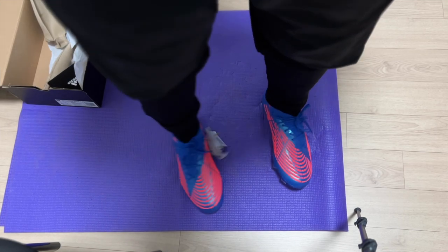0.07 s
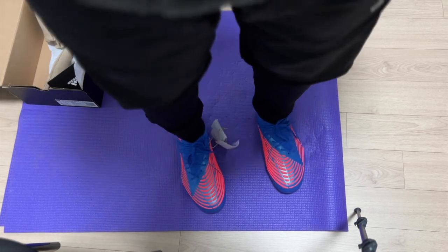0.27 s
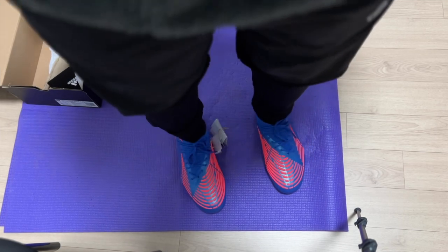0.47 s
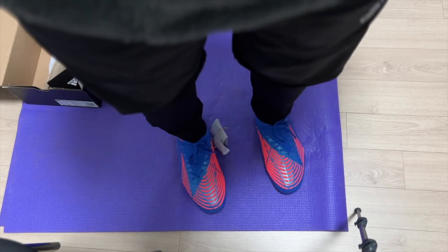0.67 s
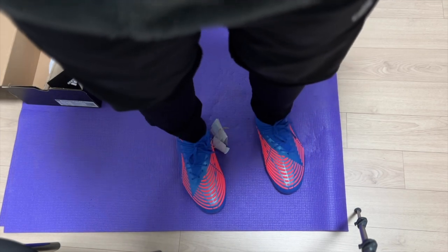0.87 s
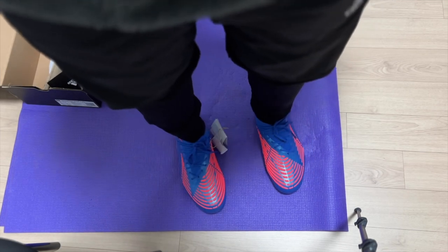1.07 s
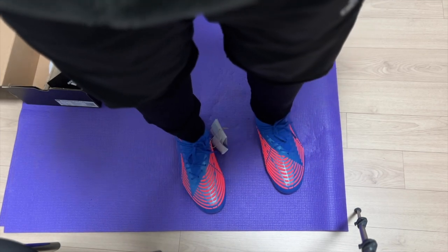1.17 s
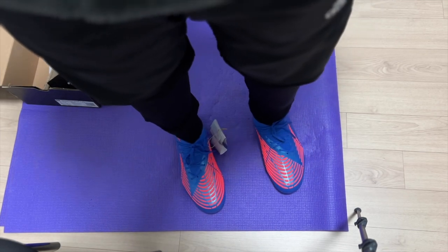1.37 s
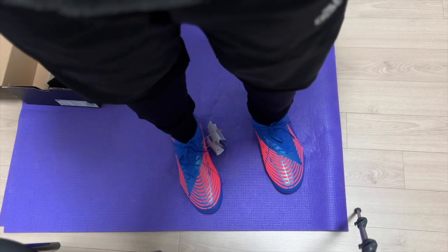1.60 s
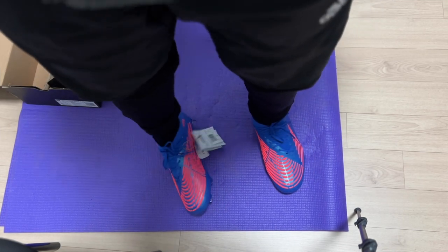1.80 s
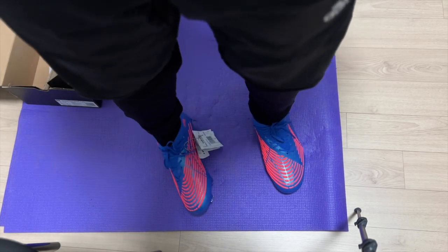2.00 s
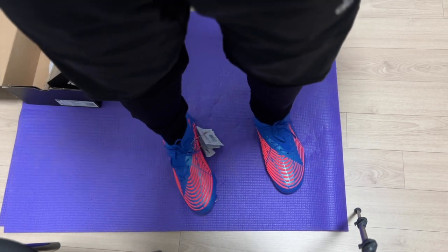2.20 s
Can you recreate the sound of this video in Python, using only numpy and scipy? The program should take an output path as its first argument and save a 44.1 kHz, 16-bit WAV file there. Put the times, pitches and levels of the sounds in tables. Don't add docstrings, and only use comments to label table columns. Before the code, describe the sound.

Studded boots shift weight on a foam mat with soft crackles and fabric rustle, then one sole snaps, squeaks and scrapes sharply; quieter creaks and stud pops follow. Close stereo microphone in a quiet, dry room.

```python
import sys
import numpy as np
from scipy import signal
from scipy.fft import rfft, irfft, next_fast_len
from scipy.io import wavfile
from scipy.ndimage import map_coordinates

SR = 44100
rng = np.random.default_rng(int(sys.argv[2]) if len(sys.argv) > 2 else 0)


def makeup_ratio(level_db):
    decades = np.asarray(level_db, float) / 20
    return 10 ** decades


def unload_wav(signal):
    wavfile.write(
        sys.argv[1],
        SR,
        np.round(np.clip(np.atleast_2d(signal).T, -1, 1) * 32767).astype(np.int16),
    )


N = 99225

SCATTER_DB = 2.5
SQUEAK_ROUGH, FLUTTER_DB = 0.03, 3.2


def unit(x):
    return x / np.sqrt(np.mean(x ** 2) + 1e-20)


def along(points, hz):
    f, v = np.transpose(points)
    return np.interp(np.log(hz + 1), np.log(f + 1), v)


def curves(rows):
    s, *cols = np.transpose(rows)
    return [np.interp(np.arange(N) / SR, s, c) for c in cols]


def wobble(rate):
    knots = rng.standard_normal(int(N * rate / SR) + 4)
    return map_coordinates(knots, [np.arange(N) * rate / SR])


def filtered(x, response):
    m = next_fast_len(N + SR // 2)
    return irfft(rfft(x, m) * response(np.fft.rfftfreq(m, 1 / SR)), m)[..., :N]


def noise(spectrum, channels=1):
    white = rng.standard_normal((channels, N))
    return unit(filtered(white, lambda hz: makeup_ratio(along(spectrum, hz))))


def rings(rows):
    s, db, hz, cycles = np.transpose(rows)[:, :, None]
    k = np.arange(900)
    turns = hz * k / SR
    decay = makeup_ratio(db + 10 - 26 * turns / np.maximum(cycles, 0.3))
    onset = (1 - np.exp(-turns / 0.34)) ** 2
    wave = decay * np.sin(2 * np.pi * turns) * onset
    at = (np.round(s * SR).astype(int) + k).ravel()
    return np.bincount(at, wave.ravel(), N + SR)[:N]


def grains(rate, hz, span, cycles, width):
    tilt_db, spread_db = 1.5, 2.5
    length = span[1] - span[0]
    u = rng.random((1000, 4))[:int(rate * length)]
    pitch = np.clip(hz * np.exp(width * 2 * (u[:, 1] + u[:, 2] - 1)), 170, 9000)
    level_db = tilt_db * np.log2(pitch / hz) - spread_db * np.log(u[:, 3] + 0.02)
    x = rings(np.c_[span[0] + u[:, 0] * length, level_db, pitch, cycles + 0 * pitch])
    return unit(x) * np.sqrt(length * SR / N)


def shifting():
    # f/Hz, level/dB
    foam_spectrum = [(110, -23), (250, -5), (600, 8), (1200, 1.5), (2500, -12), (6000, -37.5)]
    # f/Hz, level/dB
    fabric_spectrum = [(500, -34), (1500, -1), (3000, -2.5), (6000, -11), (10000, -25), (15500, -55)]
    # t/s, length/s, level/dB, crackle f/Hz, rustle level/dB
    strokes = [(0, 0.054, -55, 505, -9), (0.066, 0.052, -49, 1114, -11), (0.119, 0.04, -55, 775, -8.5),
               (0.163, .068, -46, 662, -10), (0.241, 0.21, -53, 777, -8.5),
               (0.484, 0.064, -48.5, 817, -5.5), (0.559, .2, -58, 450, -6), (.88, .16, -61, 332, -9.5),
               (1.164, 0.043, -65, 458, -8), (1.248, 0.093, -55, 807, -12), (1.349, .19, -60, 680, -6.5),
               (1.619, 0.17, -65.5, 626, -3), (1.776, .04, -53.5, 690, -10),
               (1.805, .07, -49.5, 546, -11.5), (1.875, .13, -49.5, 425, -8.5), (1.99, .26, -53, 642, -23),
               (2.101, .05, -57, 430, -11.5), (2.189, 0.06, -58, 455, -13)]
    press_share, lift_s = 0.17, 0.02
    crackle_rate, crackle_db = 1600, -2

    t = np.arange(N) / SR
    dull = makeup_ratio(SCATTER_DB * wobble(110) - 4) * noise(foam_spectrum)[0]
    bright = makeup_ratio(SCATTER_DB * wobble(130)) * noise(fabric_spectrum, channels=2)
    foam, rustle = np.zeros(N), np.zeros((2, N))
    for s, length, db, hz, rustle_db in strokes:
        load = np.clip((t - s) / (press_share * length), 0, 1)
        press = makeup_ratio(db) * load * np.exp(-np.maximum(t - s - length, 0) / lift_s)
        width = np.clip(1.28 + rustle_db / 28, 0.2, 1)
        crackle = grains(crackle_rate, hz, (s, s + length + lift_s), cycles=3.28, width=width)
        foam += press * (dull + makeup_ratio(crackle_db) * crackle)
        threads = grains(crackle_rate / 4, 2400, (s, s + length), cycles=2.5, width=0.5)
        rustle += press * makeup_ratio(rustle_db) * (bright + 0.99 * threads)
    return foam, rustle


def studs():
    # t/s, level/dB, f/Hz
    pops = [(.1745, -28, 1000), (.368, -32, 374), (.383, -29.5, 367), (.4985, -24.5, 389),
            (.5115, -24, 940), (.535, -22.5, 636), (.547, -25.5, 800), (.5948, -21.5, 930),
            (.619, -32, 700), (.6235, -28, 850), (.6603, -23, 670), (.684, -31.5, 800), (.721, -35, 750),
            (.735, -39, 346), (.748, -35.5, 364), (.761, -43, 400)]
    # t/s, level/dB, f/Hz
    late_pops = [(.906, -44, 766), (1.002, -44, 378), (1.196, -42.5, 524), (1.239, -42.5, 1600),
                 (1.2555, -34.5, 1140), (1.26, -36, 844), (1.309, -42.5, 605), (1.3655, -34, 1490),
                 (1.391, -43, 600), (1.668, -41.5, 990), (1.8945, -39.5, 745), (1.9655, -32, 780)]
    # t/s, level/dB, f/Hz
    ticks = [(.596, -39, 1700), (.6845, -36.5, 5160), (.685, -38, 1300), (1.632, -44.5, 4500),
             (1.668, -45, 3000), (1.782, -47, 3500), (1.896, -51, 5200), (1.9275, -43, 6500),
             (1.9645, -34.5, 2600), (.512, -27.5, 2730), (.5355, -26, 2500), (.606, -45, 2120),
             (.654, -36.5, 2000), (.6845, -32.5, 2400), (1.002, -43, 2000), (.714, -42.5, 4460),
             (.959, -44.5, 2580), (1.362, -43.5, 5440), (1.8955, -43, 2650), (1.927, -39, 3540),
             (2.098, -44, 4280)]
    # t/s, level/dB, f/Hz
    sparks = [(.414, -37, 8560), (.4525, -36, 8500), (.4768, -25.5, 7400), (.482, -36, 7140),
              (.4748, -35, 8600), (.4935, -39, 6500), (.496, -41, 7600), (.512, -42, 6960),
              (.529, -50, 8950), (.547, -38.5, 6000), (1.719, -60, 7950), (1.868, -57.5, 7760),
              (2.015, -62, 8500), (1.974, -51, 12200), (2.045, -54, 11500)]
    # t/s, level/dB, f/Hz
    thuds = [
        (.37, -43, 110),
        (.465, -40, 138),
        (.745, -44, 158),
        (1.0, -49, 171),
        (2.115, -45.5, 128),
    ]
    # t/s, level/dB, f/Hz, cycles
    creaks = [(.035, -45, 885, 2.6), (0.0713, -39.5, 1450, 3), (.081, -47, 1880, 5.6), (.1045, -39, 940, 4),
              (0.114, -44, 3480, 9.1), (0.1642, -36.5, 1390, 2.5), (0.2003, -37.5, 550, 3.3),
              (.2015, -42, 1700, 5), (0.236, -36, 1400, 2.2), (.2448, -36, 1094, 2.9),
              (0.2466, -38, 1660, 6.2), (0.2504, -39.5, 1610, 6.2), (1.075, -55, 1180, 3),
              (1.719, -55, 3000, 2), (1.867, -39, 493, 2.9), (1.915, -48, 1600, 1.5),
              (1.9415, -44, 2440, 4.5), (1.944, -41, 345, 1.94), (1.952, -41, 400, 3),
              (1.968, -36, 417, 2.3), (1.983, -45, 2500, 4), (1.982, -39.5, 472, 3.7),
              (2.046, -43, 650, 3.6), (2.057, -42, 640, 3.3), (2.1255, -40, 646, 3.9),
              (2.2125, -43, 676, 4.8)]
    kinds = (pops, 1.306), (late_pops, 2.32), (ticks, 1.97), (sparks, 6.2), (thuds, 1.94)
    rows = [(*row, cycles) for table, cycles in kinds for row in table]
    return rings(rows + list(creaks))


def skid():
    # t/s, level/dB, hiss level/dB
    skid_course = [
        (0.4191, -32.5, -3),
        (0.4334, -33, -8.5),
        (.437, -37, -15),
        (0.453, -33.5, -15),
        (0.458, -45, -15),
        (0.474, -41, -8),
        (0.485, -52, -5),
        (0.55, -55, -4.5),
        (.562, -78, -12),
    ]
    # t/s, level/dB, f/Hz, cycles
    hard_slips = [(.2875, -18.5, 2000, 1.25), (.2885, -17, 5600, 2.3), (.2915, -21, 5200, 2.3),
                  (.4207, -22.5, 2640, 3.6), (.4217, -21.5, 1380, 1.94), (.4252, -28, 1530, 2),
                  (.4268, -23, 2170, 1.8), (.4283, -26, 790, 2.07), (.43, -23, 2600, 2),
                  (.4462, -25.5, 760, 2.5), (.4715, -33, 1780, 3.3), (.475, -35, 4060, 6.8),
                  (.4757, -30.5, 1000, 2.5), (.4318, -27, 3150, 6.8), (.4335, -24.5, 1710, 3.5),
                  (.4345, -26, 800, 1.7), (.439, -30, 2000, 2.3), (.4392, -24.5, 3850, 4.1),
                  (.4424, -19.5, 2740, 2.2), (.4445, -26, 2220, 1.5), (.4495, -16.5, 3220, 4.5),
                  (.4493, -19.5, 1630, 2.7), (.4528, -14, 824, 0.95), (.4612, -31, 2830, 21),
                  (.464, -26, 1390, 2.3)]
    # f/Hz, level/dB
    grit_spectrum = [(2000, -16), (4500, -1.5), (7000, -4), (9500, -3.5), (12000, -16), (15500, -20)]
    level_db, hiss_db = curves(skid_course)
    start, end = span = skid_course[0][0], skid_course[-1][0]
    t = np.arange(N) / SR
    on = np.clip((t - start) / 0.0019, 0, 1) * (t < end)
    body = makeup_ratio(1) * grains(3200, 2000, span, cycles=2.6, width=0.44)
    grit = makeup_ratio(hiss_db + SCATTER_DB * wobble(400)) * noise(grit_spectrum)[0]
    return on * makeup_ratio(level_db) * (body + grit) + rings(hard_slips)


def squeal():
    # t/s, f/Hz, level/dB
    squeal_course = [
        (.358, 2030, -56),
        (.364, 1930, -49),
        (.373, 1730, -52),
        (.381, 1646, -44.5),
        (.39, 1525, -47),
        (.395, 1540, -54),
        (.4, 1617, -50),
        (.41, 1540, -47.5),
        (.424, 1560, -48),
    ]
    # multiple, level/dB
    overtones = [(2, 0.5), (3, 3), (4, -5)]
    hz, level_db = curves(squeal_course)
    t = np.arange(N) / SR
    turns = np.cumsum(hz * (1 + SQUEAK_ROUGH / 2 * wobble(600))) / SR
    tones = np.zeros(N)
    for k, db in overtones:
        tones += makeup_ratio(db + 0.7 * FLUTTER_DB * wobble(350)) * np.sin(2 * np.pi * k * turns)
    return makeup_ratio(level_db) * tones * (t > squeal_course[0][0]) * (t < squeal_course[-1][0])


def squeaks():
    # t/s, length/s, start f/Hz, end f/Hz, level/dB
    squeak_glides = [(0.283, 0.0083, 7280, 5770, -33.5), (.294, 0.0074, 6150, 5760, -39),
                     (0.323, 0.014, 4300, 4160, -44), (0.334, .004, 4300, 5500, -47),
                     (0.344, 0.011, 5600, 5600, -47), (0.351, 0.0085, 5270, 5060, -42),
                     (.345, .01, 3800, 3900, -50), (0.353, 0.012, 4150, 4250, -45),
                     (0.316, 0.0076, 5400, 5260, -48), (0.466, .011, 4530, 4770, -46.5),
                     (0.492, 0.0096, 4950, 4700, -45), (0.536, 0.018, 4470, 4320, -51)]
    # f/Hz, level/dB
    rub_spectrum = [(2500, -7.5), (4500, -2), (6000, 5), (8000, -9.5), (12000, -36)]
    t = np.arange(N) / SR
    rub = makeup_ratio(-51.5 + SCATTER_DB * wobble(197.2)) * noise(rub_spectrum)[0]
    out = rub * (t > 0.284) * (t < 0.42)
    for s, length, from_hz, to_hz, db in squeak_glides:
        u = np.clip((t - s) / length, 0, 1)
        hz = (from_hz + (to_hz - from_hz) * u) * (1 + SQUEAK_ROUGH * wobble(500))
        level = makeup_ratio(db + 0.5 + FLUTTER_DB * wobble(400)) * np.sin(np.pi * u) ** 0.18
        out += level * np.sin(2 * np.pi * np.cumsum(hz) / SR)
    return out


def room(x):
    # f/Hz, t60/s
    decay_times = [(300, 0.066), (8000, 0.019)]
    echo_s = 0.003004
    hz, t, z = signal.stft(rng.standard_normal((2, SR // 4)), SR, nperseg=128)
    t60 = np.maximum(along(decay_times, hz), 0.01)[:, None]
    tail = signal.istft(z * makeup_ratio(-60 * t / t60), SR, nperseg=128)[1]
    late = np.pad(x, (round(echo_s * SR), 0))[None]
    return signal.fftconvolve(late, tail / np.linalg.norm(tail[0]), axes=1)[:, :N]


def floor():
    # f/Hz, level/dB per Hz
    hush_spectrum = [(15, -37), (25, -14.5), (369, -2), (1240, -7.5), (1760, -10), (2180, -12.5),
                     (6570, -18.5), (15600, -42.5)]
    # f/Hz, likeness
    likeness = [(60, 0.88), (300, 0.53), (1000, 0.31), (3000, 0.27), (7000, 0)]

    def mid_and_side(hz):
        turn = np.arccos(np.clip(along(likeness, hz), -1, 1)) / 2
        return np.array([np.cos(turn), np.sin(turn)])

    pair = noise(hush_spectrum, channels=2) * makeup_ratio(0.67 * wobble(8.33))
    mid, side = filtered(pair, mid_and_side)
    return makeup_ratio(-61.5) * unit(np.array([mid + side, mid - side]))


def scene():
    # f/Hz, level/dB
    left_lead = [(500, 1.1), (2500, 0.8), (5000, -6), (14000, -3)]
    feet_low_hz, lag_s = 110, 2e-5
    room_db, foam_wide_db = -12, -10.5
    foam, rustle = shifting()
    sources = foam + skid() + squeaks() + squeal() + studs()
    feet = filtered(sources, lambda hz: (1j * hz / (feet_low_hz + 1j * hz)) ** 2)
    side = np.array([[1], [-1]]) / 2
    near = filtered(feet, lambda hz: makeup_ratio(side * along(left_lead, hz)) * np.exp(-2j * np.pi * hz * lag_s * side))
    return near + rustle + makeup_ratio(room_db) * room(feet) + makeup_ratio(foam_wide_db) * room(foam) + floor()


def roll_off(x):
    return signal.sosfilt(signal.butter(12, 15700, fs=SR, output="sos"), x)


def record(dry):
    mix = filtered(dry, lambda hz: hz < 15750)
    return roll_off(mix)


dry = scene()
out = record(dry)
unload_wav(out)
```